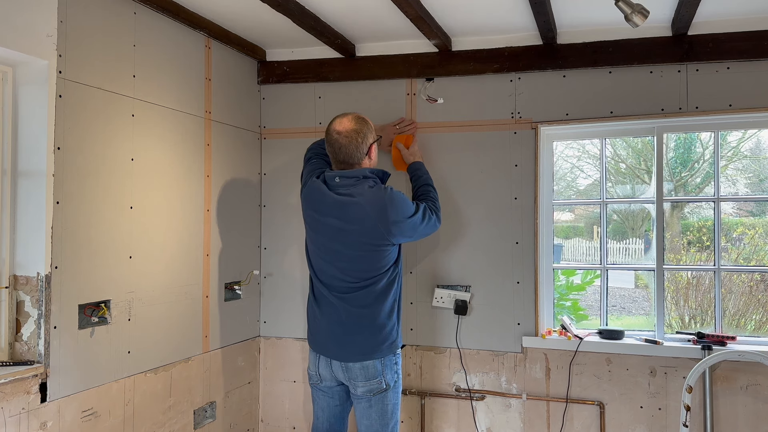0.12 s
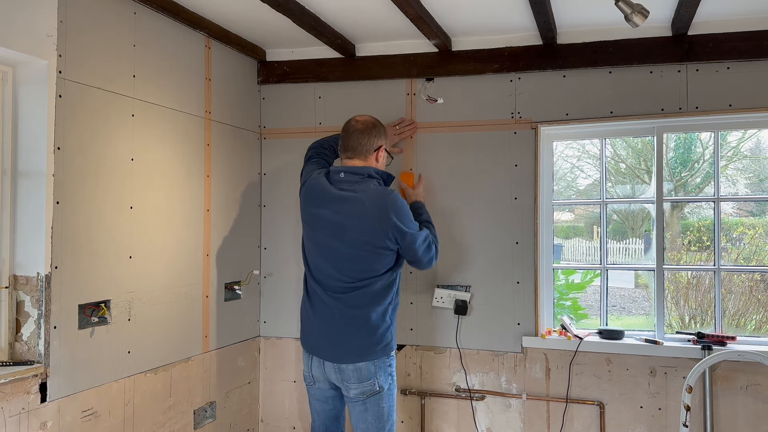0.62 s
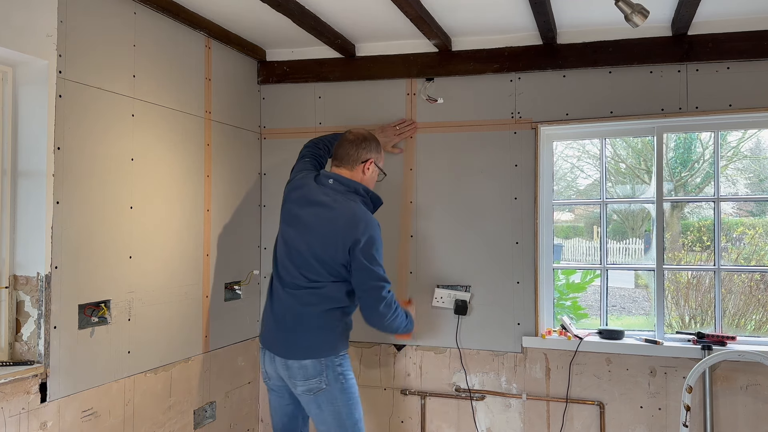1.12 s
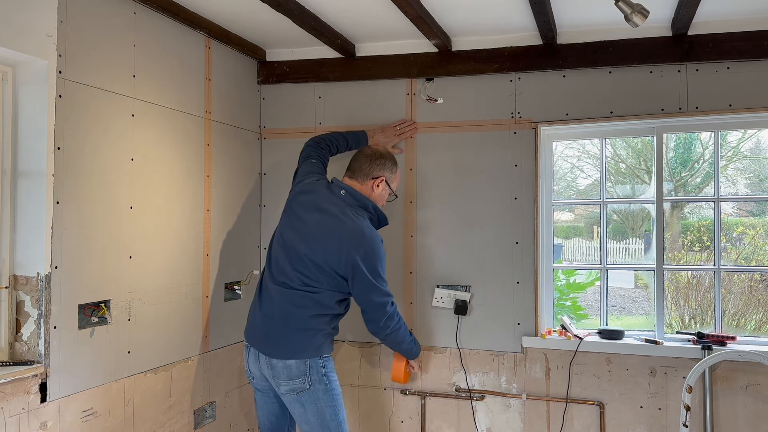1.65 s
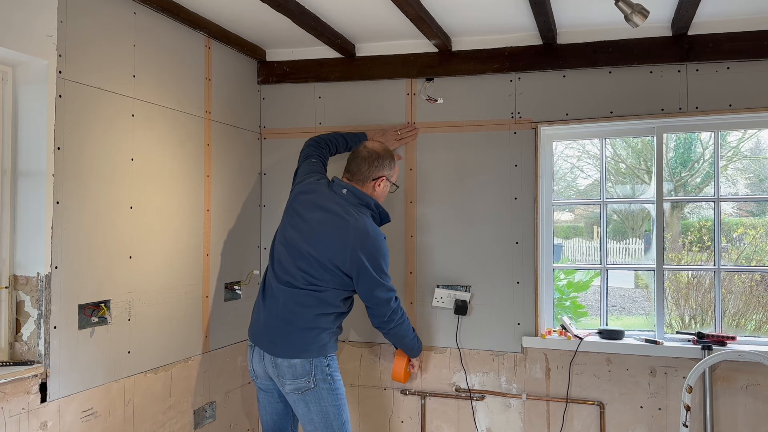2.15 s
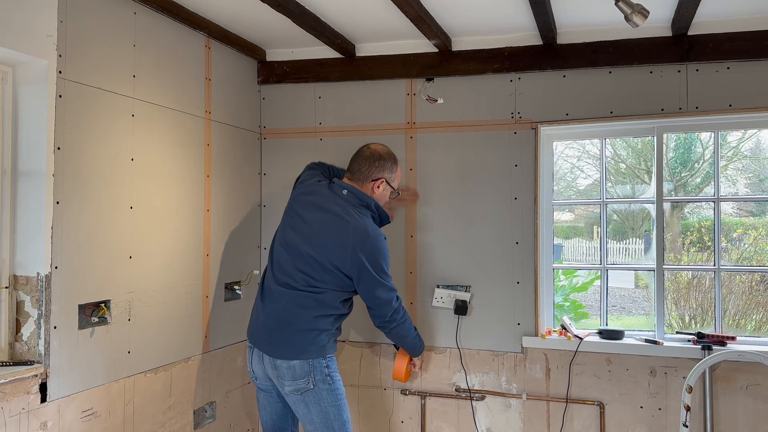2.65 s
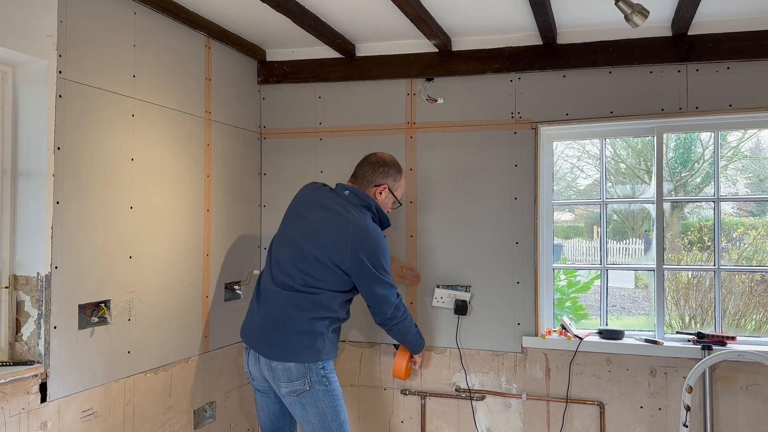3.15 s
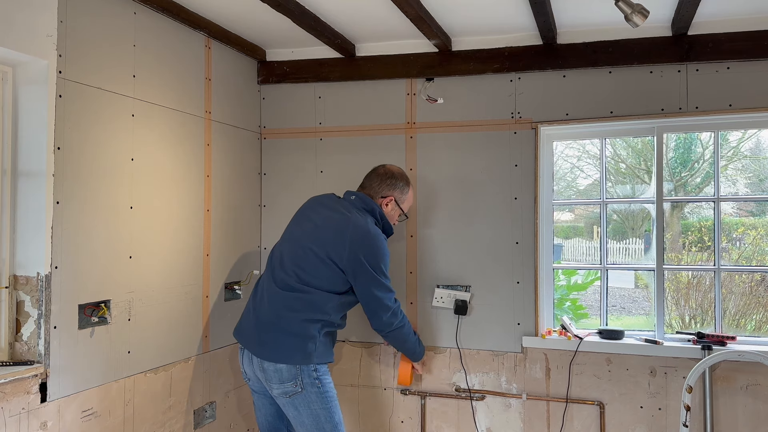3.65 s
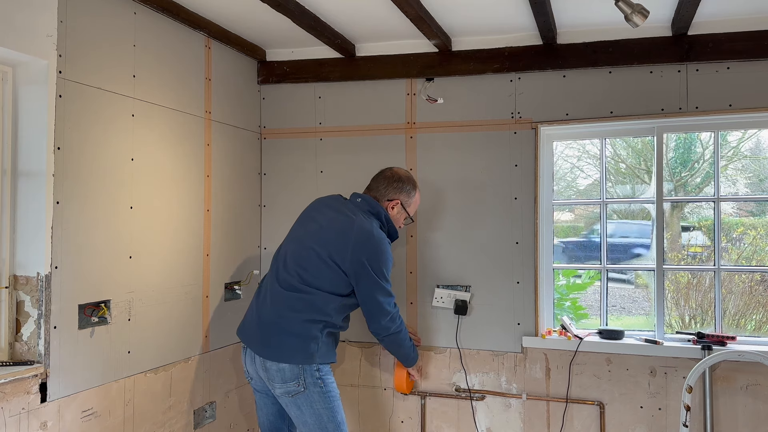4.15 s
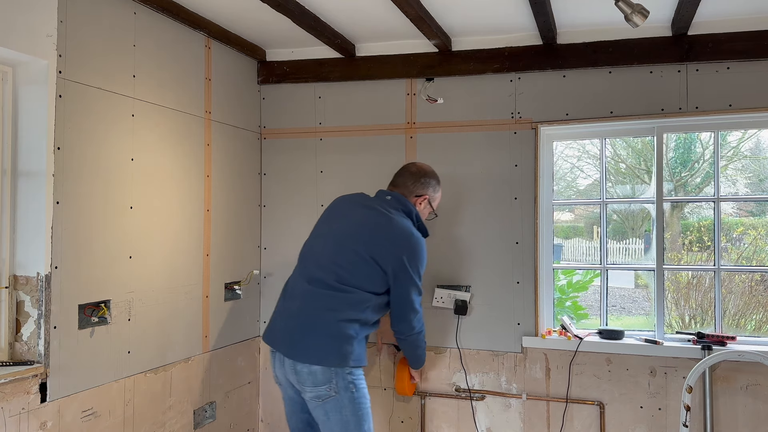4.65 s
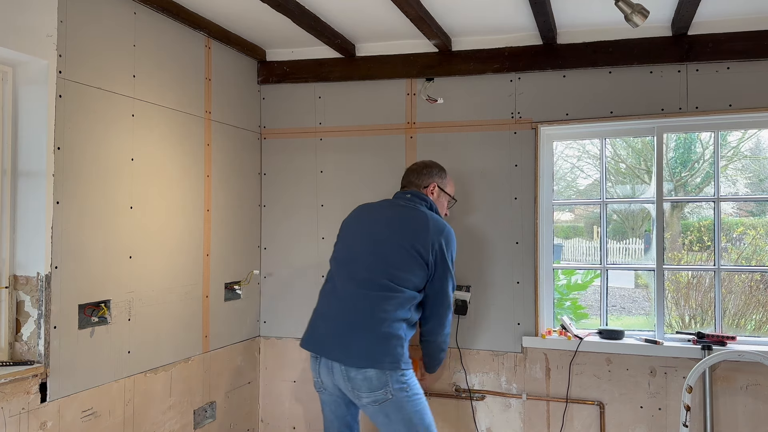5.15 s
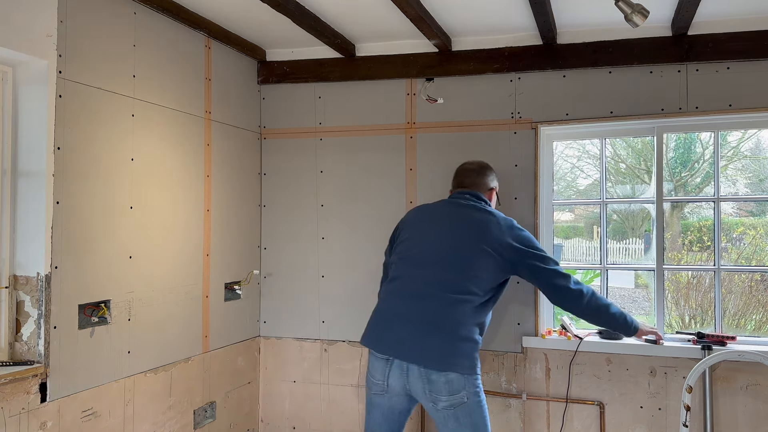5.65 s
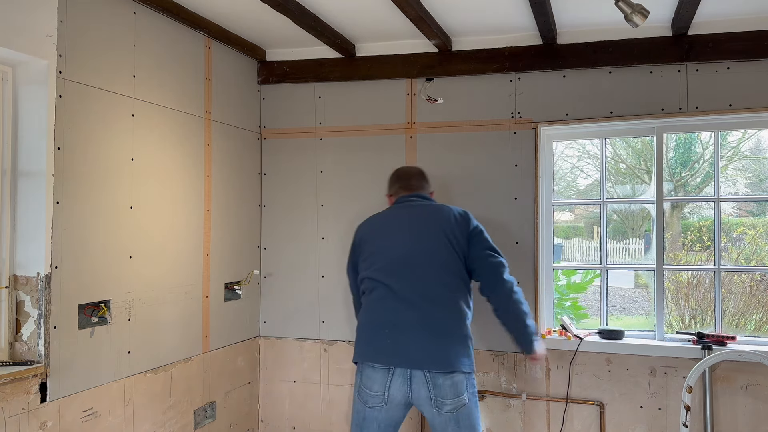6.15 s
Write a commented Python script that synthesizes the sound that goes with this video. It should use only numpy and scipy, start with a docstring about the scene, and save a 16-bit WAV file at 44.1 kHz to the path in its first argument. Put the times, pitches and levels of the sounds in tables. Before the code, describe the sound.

A crackly rasp of tape swells quickly, with low hollow wallboard rumble, then stops. After a short quiet, a finer, steadier hand-rubbing hiss follows, ending in a dull thump. Faint cloth rustles, small knocks and a muffled passing car fill the gap before a sharp clatter and boom on the sill. Small stereo microphone, live bare room, low room tone.

```python
"""Mesh tape is peeled off its roll down a plasterboard wall in a bare room: slips rasp, and drum the board.
A palm then smooths it down the joint in finer, denser slips, with knocks and soft landings of weight throughout.
Clothes and feet shuffle, mostly after the palm stops, while a car passes outside as a swell of dull noise.
Near the end the dropped roll rings the window sill. Room tone, from shaped noise, lies under it all;
a small two-port microphone listens, with the close sound in front and only echoes and room tone across."""
import sys
import numpy as np
from scipy import signal
from scipy.fft import rfft, irfft, next_fast_len
from scipy.io import wavfile

SR = 44100
rng = np.random.default_rng(int(sys.argv[2]) if len(sys.argv) > 2 else 0)


def digitize_waveform(pressure):
    """Quantize a signal to 16-bit integers and store it at the path in sys.argv[1].

    Rows of a 2-D input are taken as channels; values are limited to [-1, 1].
    """
    field = np.atleast_2d(pressure).T
    bounded = np.clip(field, -1, 1)
    quanta = np.round(bounded * 32767).astype(np.int16)
    wavfile.write(sys.argv[1], SR, quanta)


def makeup_ratio(level_db):
    """Linear amplitude ratio for a level in decibels (20 dB per factor of ten)."""
    decades = np.asarray(level_db, float) / 20
    return 10 ** decades


N = 277389

# plasterboard modes, rubbed or struck: hz, width_hz, level_db
BOARD = [(209.8, 73, 5.5), (270.2, 49.5, 1.5), (345, 15, -7), (437, 69, -18)]
LEAD_S = 0.005  # a blow or landing starts to rise this long before its listed time


def evened(x):
    """Scales to rms 1."""
    return x / np.sqrt(np.mean(x ** 2) + 1e-20)


def read(points, hz):
    """Reads a table over log frequency."""
    f, value = np.transpose(points)
    return np.interp(np.log(hz + 1), np.log(f + 1), value)


def level_curve(s, db):
    """Gain at every sample from a table of times and dB; practically silent outside it."""
    return makeup_ratio(np.interp(np.arange(N) / SR, s, db, -150, -150))


def coloured(x, spectrum):
    """Causal minimum-phase filter with the given spectrum; rms 1."""
    hz = abs(np.fft.fftfreq(4096, 1 / SR))
    log_gain = np.log(makeup_ratio(np.maximum(read(spectrum, hz), -100)))
    taps = np.fft.ifft(np.exp(np.conj(signal.hilbert(log_gain)))).real[:2048]
    return evened(signal.oaconvolve(x, taps)[:len(x)])


def ringing(x, modes):
    """Answer of a few resonances to a push, kept to the range of the modes; rms 1."""
    out = np.zeros(len(x))
    for hz, width_hz, db in modes:
        r = np.exp(-np.pi * width_hz / SR)  # pole radius: a wider mode dies sooner
        poles = [1, -2 * r * np.cos(2 * np.pi * hz / SR), r * r]
        out += makeup_ratio(db) * (1 - r) * signal.lfilter([1, 0, -1], poles, x)
    edges_hz = [0.5 * modes[0][0], 1.32 * modes[-1][0]]
    band = signal.butter(2, edges_hz, "bandpass", fs=SR, output="sos")
    return evened(signal.sosfilt(band, out))


def slips(per_s, spread_db, flutter_db, flutter_s):
    """Random releases of uneven size and either sign; the grip flutters and so varies their size."""
    size = makeup_ratio(spread_db * np.minimum(rng.exponential(1, N), 5)) * rng.choice([-1., 1.], N)
    smoothing = np.exp(-(np.arange(-2000, 2000) / SR / flutter_s) ** 2)
    grip = evened(signal.oaconvolve(rng.standard_normal(N), smoothing, "same"))
    released = rng.random(N) < per_s / SR
    return size * released * makeup_ratio(flutter_db * grip)


def stroke(rows, boom_db):
    """Levels along one long stroke; the cavity follows the board, boom_db relative to it."""
    s, bright_db, board_db = np.transpose(rows)
    board = level_curve(s, board_db)
    return level_curve(s, bright_db), board, makeup_ratio(boom_db) * board


def friction(levels, spectrum, grains):
    """The same slips sound bright in the air and low through the board and the cavity behind it."""
    # wall cavity modes: hz, width_hz, level_db
    cavity = [(65, 34, -5), (106, 35, 6.5), (140, 29.6, -1)]
    layers = coloured(grains, spectrum), ringing(grains, BOARD), ringing(grains, cavity)
    return sum(level * layer for level, layer in zip(levels, layers))


def peel():
    """Tape tears off the roll in uneven slips: the pull down the wall, a check, and a last tug."""
    # course of the pull, before the room: start_s, rasp_db, board_drumming_db
    pull = [(0.0, -63, -68.5), (0.11, -73, -65), (0.16, -65.5, -64), (0.23, -61.5, -60.5),
            (0.3, -49.5, -52), (0.38, -47.5, -47.5), (0.42, -45, -47), (0.56, -37.5, -43.5),
            (0.682, -38, -40.5), (0.816, -43, -46.5), (0.85, -38.5, -54), (0.928, -41, -53.5),
            (1.002, -43, -45.5), (1.108, -52, -73), (1.168, -39, -43), (1.242, -48.5, -55.5),
            (1.442, -49.5, -59.5), (1.56, -117, -78)]
    # colour of the rasp: hz, relative_db_per_hz
    rasp = [(290, -30), (500, 1.5), (586, -3), (960, -5.5), (1140, -2), (1360, -7.5), (1770, -7.5),
            (3150, -10.5), (3550, -5.5), (7100, -4), (9220, -3), (11300, -11), (14700, -10.5),
            (16000, -24.5)]
    grains = slips(per_s=9000, spread_db=2.9, flutter_db=1.86, flutter_s=0.0047)
    return friction(stroke(pull, boom_db=-7), rasp, grains)


def strip():
    """Noise rings the free length of taut tape, which hisses at one pitch late in the pull."""
    # level of that hiss, before the room: start_s, level_db
    taut = [(1.2, -81), (1.27, -68), (1.42, -61), (1.5, -87)]
    # resonance of the stretched strip: pitch_hz, width_hz, level_db
    tape_mode = [(3550, 150, 0)]
    s, db = np.transpose(taut)
    return level_curve(s, db) * ringing(rng.standard_normal(N), tape_mode)


def palm():
    """A palm slides down the joint: many small, rather even slips."""
    # course of the hand, before the room: start_s, hiss_db, board_rumble_db
    smoothing = [(2.04, -91, -90), (2.06, -67, -86), (2.108, -69, -71), (2.134, -67.5, -63.5),
                 (2.428, -50.5, -52), (2.72, -49.5, -71), (2.806, -50.5, -55.5), (2.906, -51, -65.5),
                 (3.322, -51.5, -54.5), (3.73, -64, -56), (3.95, -95, -73)]
    # colour of skin on mesh: hz, relative_db_per_hz
    skin = [(290, -23.5), (500, -5), (1360, 1), (2130, -3), (3590, 2.5), (8090, -1.5), (9360, -0.5),
            (11500, -7.5), (15100, -9.5), (16000, -5)]
    grains = slips(per_s=20000, spread_db=1.8, flutter_db=0.8, flutter_s=0.005)
    return friction(stroke(smoothing, boom_db=-2.5), skin, grains)


def knocks():
    """Each blow: a rattling crack, a dull ring of the struck thing, a thud in the board or the sill."""
    # blows, before their envelopes and the room: time_s, crack_db, ring_hz, ring_db, thud_db
    blows = [(0.17, -71, 500, -78, -80), (1.135, -34, 473, -44, -44.5), (1.845, -62, 330, -66, -62),
             (2.379, -52, 300, -64, -62), (3.587, -43.5, 510, -66, -75), (4.4639, -62.5, 930, -60, -69),
             (4.675, -55, 565, -44, -64), (4.889, -56, 513, -54.5, -63), (5.367, -59, 480, -36, -55),
             (5.641, -50, 1880, -38.5, -40.5), (5.645, -58, 770, -28.5, -53),
             (5.701, -46.5, 2730, -46, -48.5), (5.79, -18.5, 430, -35.5, -30.5)]
    # colour of the crack: hz, relative_db_per_hz
    crack_colour = [(290, -38), (500, -13), (729, -17.5), (1020, -7), (1440, -12.5), (1980, -13),
                    (2190, -16), (2890, -14.5), (4600, -16.5), (5550, -9), (7750, -17.5), (9630, -12),
                    (15100, -22), (16000, -36.5)]
    # window sill modes: hz, width_hz, level_db
    sill = [(199, 35, 7.5), (304, 25, 0.5), (332, 19, 3), (364, 22, 6), (444, 29, 3), (483, 19, -4),
            (527, 15, -4), (770, 33, -9.5), (994, 30, -3.5)]
    sill_from_s = 5.6  # later blows land on the sill
    ring_width_hz = 250
    t, out = np.arange(8000) / SR, np.zeros(N + 8000)

    def envelope(rise_s, fall_s):
        """A straight rise under an exponential fall."""
        return np.exp(-t / fall_s) * np.minimum(t / rise_s, 1)

    crack, ring, thud = envelope(0.0042, 0.011), envelope(0.0046, 0.01), envelope(0.004, 0.057)
    for s, crack_db, ring_hz, ring_db, thud_db in blows:
        puff = rng.standard_normal((3, len(t)))
        struck = sill if s > sill_from_s else BOARD
        blow = makeup_ratio(crack_db) * coloured(puff[0], crack_colour) * crack
        blow += makeup_ratio(ring_db) * ringing(puff[1], [(ring_hz, ring_width_hz, 0)]) * ring
        blow += makeup_ratio(thud_db) * ringing(puff[2], struck) * thud
        out[round((s - LEAD_S) * SR):][:len(t)] += blow
    return out[:N]


def booms():
    """Weight landing on wall or floor sets off a slow low swing."""
    # landings, before the swell and the room: time_s, boom_hz, boom_db
    landings = [(1.835, 132.7, -47.5), (3.44, 147.5, -47), (3.586, 140, -37), (3.66, 93.6, -44),
                (4.229, 122, -59), (4.559, 112, -53), (4.72, 65, -51), (5.03, 62.3, -51), (5.11, 56.5, -52),
                (5.27, 119, -51), (5.285, 54.6, -50), (5.595, 55, -50), (5.82, 102.7, -26.5),
                (6.06, 55, -46)]
    rise_s, fall_s = 0.016, 0.042
    t, out = np.arange(12000) / SR, np.zeros(N + 12000)
    swell = np.exp(-t / fall_s) * (1 - np.exp(-(t / rise_s) ** 2))
    for s, boom_hz, boom_db in landings:
        swing = makeup_ratio(boom_db) * np.sin(2 * np.pi * boom_hz * t) * swell
        out[round((s - LEAD_S) * SR):][:len(t)] += swing
    return out[:N]


def swells():
    """Levels of the shuffles, each one arch; overlapping arches add in power."""
    # handling and shifting about, before the room: start_s, length_s, rustle_db, low_scuff_db, boom_db
    shuffles = [(1.546, 0.068, -70, -65.5, -68), (1.807, 0.17, -70, -59, -66),
                (3.937, 0.16, -128, -69, -70), (4.106, 0.24, -83, -65, -70), (4.259, 0.21, -68, -66.5, -72),
                (4.452, 0.2, -75, -67, -62.5), (4.544, 0.19, -61.5, -60, -54),
                (4.63, 0.15, -58, -55.5, -56), (4.71, 0.13, -63, -60, -60),
                (4.862, 0.22, -67.5, -61, -63.5), (4.993, 0.11, -67, -64, -59),
                (5.065, 0.14, -65.5, -65.5, -63), (5.203, 0.19, -72.5, -71, -60),
                (5.349, 0.092, -57, -71, -54), (5.456, 0.34, -75, -63.5, -71),
                (5.556, 0.11, -64.5, -56, -60), (5.627, 0.081, -50.5, -46.5, -60),
                (5.676, 0.17, -53.5, -51, -51.5), (6.0, 0.13, -73.5, -58, -62),
                (6.138, 0.2, -65.5, -76, -91), (6.219, .2, -65, -66.5, -86)]
    skew = 0.55  # under 1: quick to rise, slow to fall
    hop = 21  # samples per level step
    start, length, *levels_db = np.transpose(shuffles)
    t = np.arange(0, N, hop) / SR
    part = np.clip((t - start[:, None]) / length[:, None], 0, 1)
    arches = np.sin(np.pi * part ** skew) ** 4
    power = makeup_ratio(2 * np.array(levels_db)) @ arches
    return np.repeat(np.sqrt(power), hop, axis=1)[:, :N]


def cloth():
    """Clothes and feet shuffle: uneven, strongly fluttering slips under the swells."""
    # colour of the rustle: hz, relative_db_per_hz
    rustle = [(300, -41), (550, -8), (900, -9.5), (2000, -10), (4500, -13.5), (7500, -16), (9600, -14),
              (11500, -24.5), (16000, -21.5)]
    grains = slips(per_s=12000, spread_db=2.8, flutter_db=2.2, flutter_s=0.006)
    return friction(swells(), rustle, grains)


def car():
    """A car passes outside: dull noise that swells and fades with distance."""
    # tyre noise through the window glass: hz, relative_db_per_hz
    tyres = [(150, -32), (400, -2), (800, -1.5), (1400, -6.5), (2500, -21), (5000, -52)]
    nearest_s, half_width_s, level_db = 4.48, 0.49, -73.5
    t = np.arange(N) / SR
    nearness = 1 / (1 + ((t - nearest_s) / half_width_s) ** 2)
    return makeup_ratio(level_db) * coloured(rng.standard_normal(N), tyres) * nearness


def room_tone():
    """Steady shaped noise, unrelated in front and across."""
    # colour of the room tone: hz, relative_db_per_hz
    air = [(18, -34.5), (30, 7), (70, 4), (210, -10.5), (295, -16.5), (760, -20.5), (1070, -36),
           (1160, -26.5), (3140, -32), (9710, -31), (16000, -53)]
    return makeup_ratio(-68) * np.array([coloured(noise, air) for noise in rng.standard_normal((2, N))])


def room(x, wet_db, drift_s):
    """Direct sound and two unrelated echo fields, each band dying at its own speed.
    Three echo tails trade places, a half turn every drift_s, so that no fixed comb lines stand out."""
    # time for echoes to fall 60 dB: hz, t60_s
    decay = [(100, 0.17), (260, 0.41), (700, 0.44), (1840, 0.34), (4850, 0.35), (11000, 0.26)]
    out, phase = np.zeros((2, N)), np.pi * np.arange(N) / SR / drift_s
    for k in range(3):
        hz, t, bands = signal.stft(rng.standard_normal((2, SR)), SR, nperseg=256)
        t60 = np.maximum(read(decay, hz), 0.05)
        tail = signal.istft(bands * makeup_ratio(-60 * t / t60[:, None]), SR, nperseg=256)[1]
        tail[:, :180] = 0  # first wall echo comes after 4 ms
        tail /= np.linalg.norm(tail, axis=1)[:, None]
        share = x * np.sqrt(2 / 3) * np.cos(phase + k * np.pi / 3)
        out += signal.fftconvolve(share[None], tail, axes=1)[:, :N]
    # only the front holds direct sound; wet_db is its echo relative to that
    out[0] = (x + makeup_ratio(wet_db) * out[0]) / np.sqrt(1 + makeup_ratio(2 * wet_db))
    return out


def scene():
    """Two sound fields: what arrives at the front and what arrives across."""
    rubbing = peel() + strip() + palm() + cloth()
    out = room(rubbing + car(), wet_db=0.25, drift_s=0.15)
    out += room(booms(), wet_db=-7, drift_s=0.3)
    out += room(knocks(), wet_db=2.77, drift_s=0.06)
    return out + room_tone()


def top_cut(x):
    """Nothing passes above the cut-off."""
    return signal.sosfilt(signal.butter(12, 16300, fs=SR, output="sos"), x)


def record(dry):
    """Front and across become mid and side, with the port's resonance and a bass cut.
    The stereo image narrows sharply near 11 kHz."""
    # share of the side that follows the front: hz, share_0_to_1
    lean_points = [(100, 0.12), (600, 0.14), (2000, 0.2), (5500, 0.67), (8400, 0.46), (10000, 0.12)]
    # side relative to mid, as heard in the stereo image: hz, level_db
    width_points = [(60, -14.5), (130, -14), (300, -8.5), (700, -2), (2500, -2.5), (5500, -0.5),
                    (7200, -0.5), (8400, 6), (9300, -4.5), (10200, -13), (10800, -26), (13800, -14.5),
                    (15000, -2)]
    peak_hz, peak_width_hz, peak_db = 9450, 650, 4.0  # port resonance
    bass_cut_hz, band_limit_hz = 52, 15800
    size = next_fast_len(N)
    hz = np.fft.rfftfreq(size, 1 / SR)
    resonance = makeup_ratio(peak_db * np.exp(-((hz - peak_hz) / peak_width_hz) ** 2))
    bass_cut = 1 / np.sqrt(1 + (bass_cut_hz / (hz + 1)) ** 4)
    mid, across = rfft(dry, size) * resonance * bass_cut * (hz < band_limit_hz)
    lean = np.clip(read(lean_points, hz), -1, 1)
    side = makeup_ratio(read(width_points, hz)) * (lean * mid + np.sqrt(1 - lean ** 2) * across)
    mix = irfft(np.array([mid + side, mid - side]), size)[:, :N]
    return top_cut(mix)


dry = scene()
out = record(dry)
digitize_waveform(out)
```